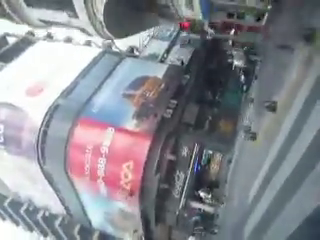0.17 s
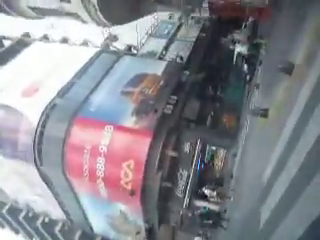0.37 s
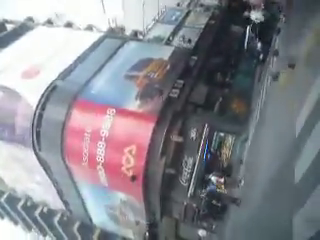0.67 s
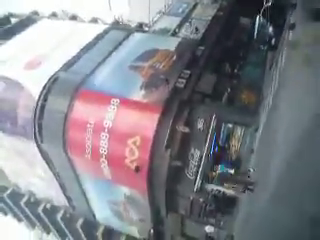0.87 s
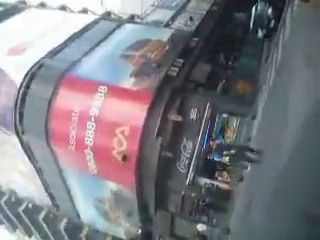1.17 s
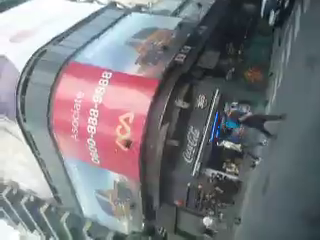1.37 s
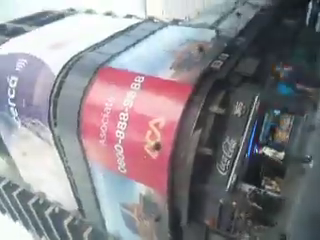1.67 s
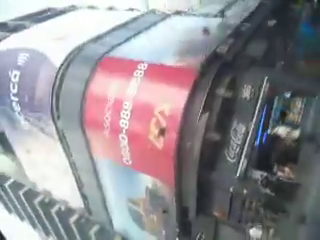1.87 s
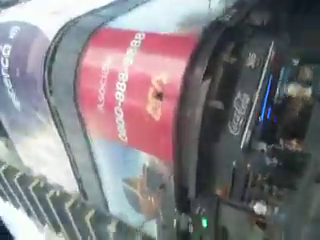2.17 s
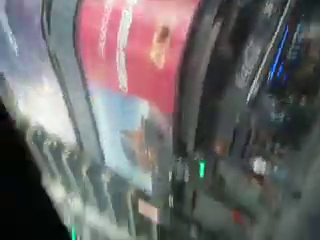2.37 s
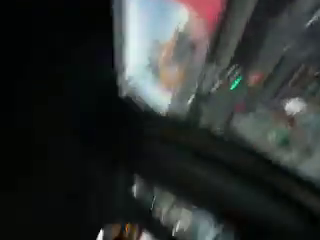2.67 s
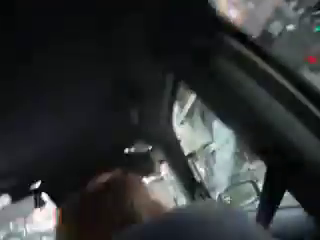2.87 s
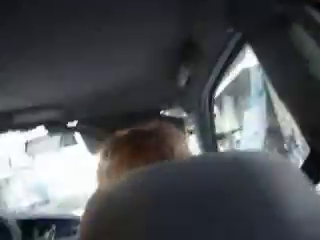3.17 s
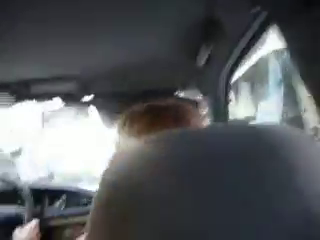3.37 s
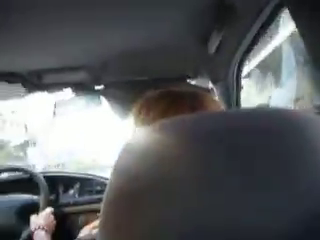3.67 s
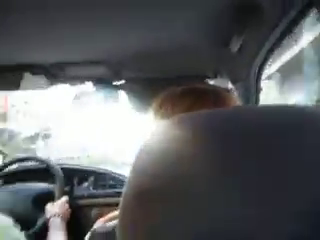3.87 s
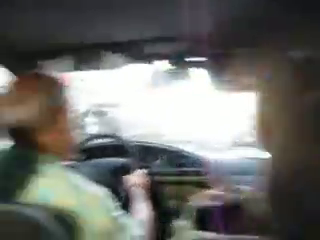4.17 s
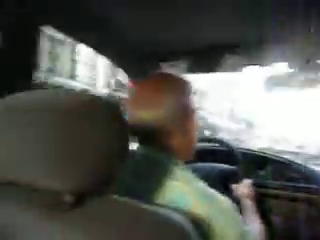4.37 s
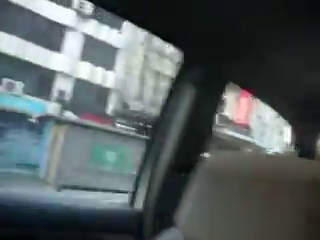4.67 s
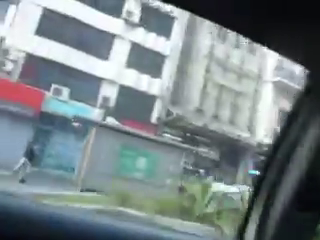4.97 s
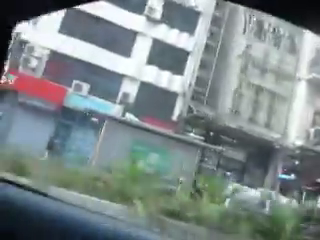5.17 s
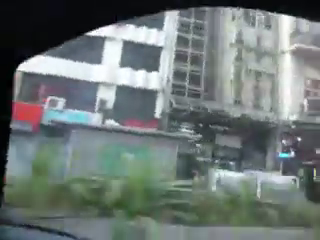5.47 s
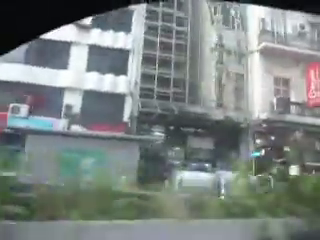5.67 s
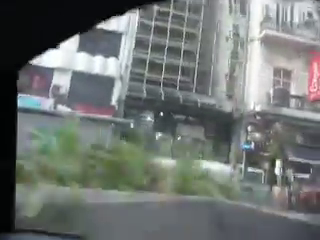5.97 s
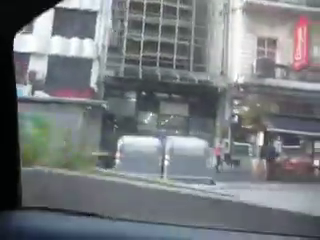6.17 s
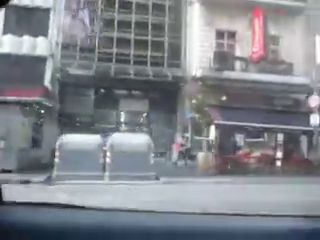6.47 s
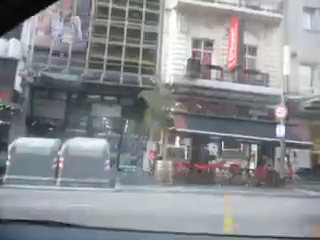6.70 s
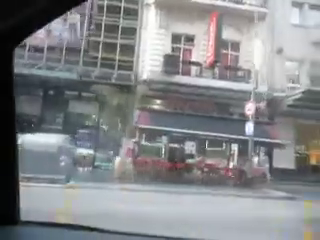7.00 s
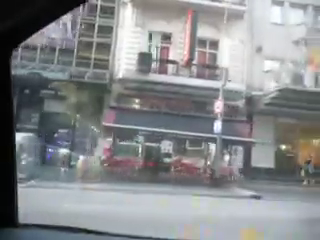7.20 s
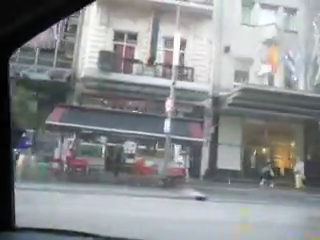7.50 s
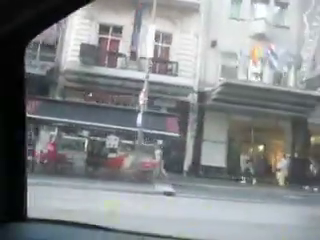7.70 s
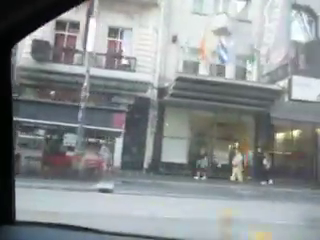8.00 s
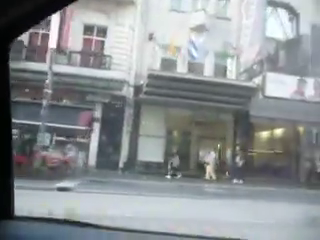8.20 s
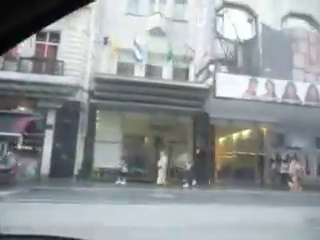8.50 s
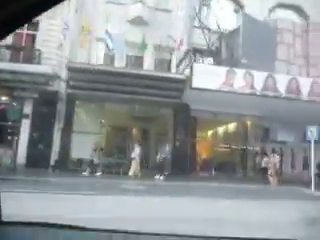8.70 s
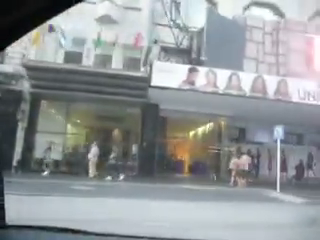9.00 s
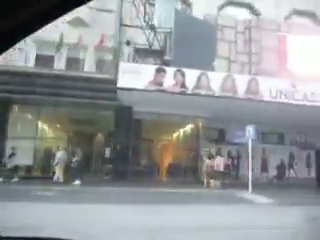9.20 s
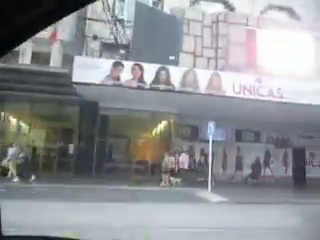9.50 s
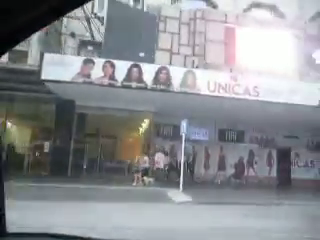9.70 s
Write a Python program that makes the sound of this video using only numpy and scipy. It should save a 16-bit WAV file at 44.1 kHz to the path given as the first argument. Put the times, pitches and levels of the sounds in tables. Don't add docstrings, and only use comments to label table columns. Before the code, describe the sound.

A small, coarse camera microphone rides in a car cabin. Heavy low rumble shakes and swells over rough asphalt, with a climbing engine hum underneath. Two short clicking gaps interrupt it. As the camera is turned, loud plastic snaps, scrapes and creaky ticks come very near, and the background dips and recovers. Afterwards the engine sits lower, tyre hiss grows, and jolts knock the interior trim.

```python
import sys
import numpy as np
from scipy import signal
from scipy.io import wavfile
from scipy.ndimage import uniform_filter1d

SR = 44100
rng = np.random.default_rng(int(sys.argv[2]) if len(sys.argv) > 2 else 0)


def generate_wav(signal):
    frames = np.transpose(np.atleast_2d(signal))
    scaled = np.clip(frames, -1, 1) * 32767
    pcm = np.round(scaled).astype(np.int16)
    wavfile.write(sys.argv[1], SR, pcm)


def voltage_ratio(decibels):
    exponent = np.asarray(decibels, float) / 20
    return 10 ** exponent


N = 434385


def rms_one(x):
    return x / np.sqrt(np.mean(x ** 2) + 1e-20)


def in_time(rows):
    s, *columns = np.transpose(rows)
    return [np.interp(np.arange(N) / SR, s, column) for column in columns]


def drift(rate_hz, depth_db):
    r = np.exp(-80 * np.pi * rate_hz / SR)
    slow = signal.lfilter([1], [1, -2 * r, r * r], rng.standard_normal(N // 40 + 2002))[2000:]
    return np.interp(np.arange(N) / 40, np.arange(len(slow)), voltage_ratio(depth_db * rms_one(slow)))


def ring(clicks, hz, t60):
    r = voltage_ratio(-60 / (t60 * SR))
    w = 2 * np.pi * hz / SR
    return signal.lfilter([0, np.sin(w)], [1, -2 * r * np.cos(w), r * r], clicks + 1e-18)


def band(x, low_hz, high_hz, order=2):
    return signal.sosfilt(signal.butter(order, [low_hz, high_hz], "band", fs=SR, output="sos"), x)


def low_pass(x, hz, order=2):
    return signal.sosfilt(signal.butter(order, hz, fs=SR, output="sos"), x)


def add(out, s, sound):
    i = round(s * SR)
    out[i:i + len(sound)] += sound[:N - i]


def banded_noise(spectrum, patchy_db):
    hz, level_db = np.transpose(spectrum[:-1])
    edges = np.geomspace(hz[0], hz[-1], int(3 * np.log2(hz[-1] / hz[0])) + 1)
    white = rng.standard_normal((2, N))
    out = 0
    for k, (low, high) in enumerate(zip(edges, edges[1:])):
        centre_db = np.interp(np.log(low * high) / 2, np.log(hz), level_db)
        out = out + voltage_ratio(centre_db) * drift(8, patchy_db) * band(white[k % 2], low, high)
    return rms_one(out)


# pitch in Hz, width in Hz,
# level in dB facing the first window, level in dB facing the second.
CABIN = [(22.16, 6, -15, -11), (81.45, 9, -7, -4), (113.4, 7, -15, -8), (135.3, 8.3, -6, -8),
         (192.3, 14, -8.5, -19.5), (254.25, 11, -14.5, -17), (402.3, 18, -26, -26.5)]


def hollow_cabin():
    turned = np.interp(np.arange(N) / SR, [2.9, 5.3], [0, 1])
    hollow = 0
    for hz, width_hz, first_db, second_db in CABIN:
        tone = rms_one(ring(rng.standard_normal(N), hz, 2.2 / width_hz))
        facing = voltage_ratio(first_db) * (1 - turned) + voltage_ratio(second_db) * turned
        hollow = hollow + facing * drift(1.2, depth_db=1.46) * tone
    return hollow


# time in seconds, coarseness of the asphalt in dB, street through the window in dB.
ROAD = [(0.0, 3, 1), (0.55, 1, 1), (1.1, -1.5, 0), (1.8, 0.5, -0.5), (2.3, 0.1, -0.5), (2.6, 2.5, 0),
        (3.2, -3, 1.5), (3.8, -4.5, 2), (4.4, -2.5, 2), (4.9, -0.85, 3), (5.6, -1.3, 1.5), (6.4, 1.8, 3.5),
        (7.2, 3.5, 2.5), (7.9, -0.75, 1.5), (8.3, -1.4, 4), (9.0, -0.3, 4.5), (9.5, 1.5, 6.5),
        (9.85, 2.5, 7)]
# time in seconds, length in seconds, swell in dB, lean from -1 (deep) to 1 (high).
HEAVES = [(0.272, .06, 3, 0.7), (0.586, .07, 4, 0.31), (1.4, 0.069, 2.5, -.4), (2.503, 0.046, 2, -0.3),
          (2.728, .08, 3.5, -0.11), (3.363, 0.031, 3.5, 0.76), (3.896, .08, 3.5, 0.79),
          (4.069, 0.037, 6, -0.87), (4.296, .05, 3, -0.71), (4.691, 0.043, 1, .5), (5.334, .04, -6, .4),
          (5.422, 0.1, 8.5, 0.38), (5.747, .06, 4, 1), (6.041, 0.055, -4, .6), (6.533, .08, -0.5, 1),
          (6.842, 0.11, -5, 0.38), (7.099, 0.038, -0.5, 0.63), (7.598, 0.09, -0.5, 0.99),
          (8.151, .06, 2.5, .6), (8.67, .08, 2, 0.81), (9.21, .08, 2.5, -0.48), (9.549, .08, 0, 0.75),
          (9.804, .05, -0.5, -.2)]
# pitch in Hz, level in dB per Hz.
BOOM = [(9.4, -39), (16, -8), (54, -4), (81, 2.5), (129, -1), (180, -8), (230, -40), (400, -120)]
ROAR = [(88, -31), (150, 1), (210, -7.5), (259, -8.5), (360, -20), (470, -50.5), (790, -120)]
TREAD = [(180, -28.5), (300, 0), (350, -8), (397, -3), (614, -11), (911, -14), (1080, -26.5), (1250, -24),
         (1620, -59), (2750, -120)]
RUSH = [(590, -29), (1000, -6.5), (1090, -6.5), (1310, -6.5), (1450, -8.5), (2540, -17.5), (4470, -24),
        (6440, -24), (8000, -28), (10400, -63), (17600, -120)]
# level in dB, share of coarseness, share of street, share of a heave.
BOOM_MIX, ROAR_MIX = (-27, 0.84, 0.03, 0.67), (-33.5, 0.53, 0.12, 1.05)
TREAD_MIX, RUSH_MIX = (-46, -0.38, 1.1, -0.01), (-60.5, -0.16, 0.71, -0.04)


def road():
    t = np.arange(N) / SR
    coarse_db, street_db = in_time(ROAD)
    deep_db = high_db = 0
    for s, length, db, lean in HEAVES:
        swell_db = db * np.exp(-((t - s) / length) ** 2)
        deep_db = deep_db + swell_db * (1 - lean)
        high_db = high_db + swell_db * (1 + lean)

    def gain(mix, heave_db):
        db, coarse, street, heave = mix
        return voltage_ratio(db + coarse * coarse_db + street * street_db + heave * heave_db)

    uneven = drift(11, depth_db=1.25)
    boom = voltage_ratio(-1.5) * uneven ** 1.1 * banded_noise(BOOM, patchy_db=-1.77) + hollow_cabin()
    roar = uneven ** 1.4 * banded_noise(ROAR, patchy_db=0.27)
    tread = uneven ** 1.1 * low_pass(banded_noise(TREAD, patchy_db=1.53), 1060, order=6)
    rush = uneven ** 0.45 * banded_noise(RUSH, patchy_db=1.25)
    low = gain(BOOM_MIX, deep_db) * boom + gain(ROAR_MIX, high_db) * roar
    return low + gain(TREAD_MIX, high_db) * tread + gain(RUSH_MIX, high_db) * rush


# time in seconds, firing rate in Hz, load in dB.
ENGINE = [(0.0, 39, -34), (0.44, 43.05, -34), (1.04, 49.83, -28), (1.78, 55.9, -24.5), (2.0, 54.98, -24),
          (2.82, 47.4, -29.5), (3.43, 45.76, -35.5), (4.72, 45.52, -34), (5.4, 36.5, -30.5),
          (5.73, 33.9, -39.5), (6.2, 34.5, -34), (6.78, 33.9, -40.5), (7.57, 36.47, -37.5),
          (8.5, 37.85, -27), (9.15, 38.82, -30.5), (9.3, 37.8, -35), (9.85, 35.6, -39.5)]
# multiple of the firing rate, level in dB.
ENGINE_ORDERS = [(1, -2.5), (2, -9.5), (3, -14.5), (4, -17)]


def engine():
    hz, load_db = in_time(ENGINE)
    phase = 2 * np.pi * np.cumsum(hz) / SR
    tones = sum(voltage_ratio(db) * drift(3, depth_db=2.5) * np.sin(k * phase) for k, db in ENGINE_ORDERS)
    return voltage_ratio(load_db + 4.5) * tones


# time in seconds, peak in dB, upper trim tones in dB, shudder length in seconds.
BUMPS = [(1.683, -17, -27.5, 0.025), (2.146, -37, -6, 0.056), (2.821, -28.5, -11, 0.025),
         (4.357, -28, -6.5, 0.03), (4.761, -22, -4, 0.02), (5.278, -36, -8.5, 0.021),
         (5.404, -21.5, -17, 0.052), (5.706, -21, -9, 0.018), (6.162, -33, -12.5, 0.014),
         (6.444, -43.5, -6.5, 0.029), (6.504, -27.5, -0.5, 0.04), (6.629, -30.5, -22.5, 0.02),
         (7.042, -31.5, -14.5, 0.028), (7.395, -37.5, -15, 0.021), (7.431, -17, -11.5, 0.035),
         (7.665, -19, -16.5, 0.025), (7.972, -37, -11, 0.022), (8.139, -13.5, -12, 0.022),
         (8.399, -29.5, -14, 0.021), (8.445, -25.5, -4, 0.024), (8.912, -21.5, -6.5, 0.024),
         (8.959, -32.5, -11, 0.011), (9.216, -37.5, -2, 0.018), (9.441, -34, -15.5, 0.041),
         (9.705, -21.5, -12.5, 0.031)]
# pitch in Hz, level in dB, time to fall 60 dB in seconds.
TRIM_LOW = [(260, -4, .07), (392, 0, .08), (470, -10, .05)]
TRIM_HIGH = [(690, 0, .045), (790, -6, .04), (960, -12, .04)]


def ring_trim(shudder, modes):
    sound = sum(voltage_ratio(db) * ring(shudder, hz, t60) for hz, db, t60 in modes)
    return sound / np.abs(sound).max()


def bumps():
    out = np.zeros(N)
    t = np.arange(SR // 6) / SR
    for s, db, upper_db, length in BUMPS:
        shudder = rng.standard_normal(len(t)) * (t < length) * np.exp(-t / 0.025)
        shudder[0] += 35
        shudder = low_pass(shudder, 900, order=4)
        knock = ring_trim(shudder, TRIM_LOW) + voltage_ratio(upper_db + 1.5) * ring_trim(shudder, TRIM_HIGH)
        add(out, s + .003, voltage_ratio(db - 3.4) * knock)
    return out


# time in seconds, peak in dB, brightness in dB, lasting ring in dB.
SNAPS = [
    (3.4261, -14.5, 4.5, -3),
    (3.965, -11, -28, -19),
]
# pitch in Hz, level in dB, time to fall 60 dB in seconds.
SNAP_MODES = [(855, 5, 0.0031), (2360, 1, 0.0023), (3750, -10, 0.0046), (5500, -19, 0.0034)]


def snaps():
    out = np.zeros(N)
    click = low_pass(signal.unit_impulse(SR // 10), 3400)
    for s, db, bright_db, ring_db in SNAPS:
        crack = 0
        for hz, level_db, t60 in SNAP_MODES:
            crack = crack + voltage_ratio(level_db + bright_db * (hz > 1500)) * ring(click, hz, t60)
        add(out, s, voltage_ratio(db) * (crack + voltage_ratio(ring_db) * ring(click, 985, 0.03)))
    return out


def stroke(s, length, db, swell_db):
    touch_s, lift_s = 0.017, 0.0064
    times = s + np.cumsum([-touch_s, touch_s, max(length, .001), lift_s])
    shape_db = np.interp(np.arange(N) / SR, times, [-25, 0, swell_db, swell_db - 25], left=-99, right=-99)
    return voltage_ratio(db + shape_db)


# start in seconds, length in seconds, level in dB, swell in dB.
PRESSES = [(3.056, 0.035, -52.5, 0.5), (3.15, .04, -53, 7), (3.197, .04, -45.5, -2), (3.248, .1, -48.5, 1),
           (3.34, .07, -46, -5), (3.436, 0.027, -38, -10.5), (3.485, .07, -39.5, -10),
           (3.6, 0.078, -50.5, -1), (3.687, .06, -45.5, 6), (3.81, .025, -50, 6), (3.851, 0.037, -34, -5.5),
           (3.901, .04, -33.5, -5.5), (3.969, 0.045, -46, -6), (5.009, 0.033, -44, -3)]
# start in seconds, length in seconds, level in dB,
# brightness in dB per band, swell in dB.
SLIDES = [(3.052, 0.026, -70, -1.5, -3.5), (3.201, 0.046, -70.5, 3, -6), (3.201, .138, -55, -10, 6.5),
          (3.337, 0.067, -63, -13, -11.5), (3.435, 0.019, -45, -8.5, -8), (3.462, 0.035, -50.5, -7, 3),
          (3.51, 0.069, -47.5, -6.5, -11), (3.606, .04, -56.5, -12, -3), (3.659, 0.035, -59, -13, 7),
          (3.699, 0.039, -50.5, -3.5, 0.5), (3.758, 0.023, -57, 2.5, -0.5), (3.792, .045, -60, -1, 5.5),
          (3.842, .035, -39.5, -8.5, -6.5), (3.898, .03, -47, -17, -1.5), (3.965, 0.085, -55, -10.5, -5),
          (4.001, .05, -76, 5, -1.5), (5.012, 0.027, -48, -21.5, -1), (5.049, .035, -57.5, -14.5, -5)]
# from Hz, to Hz.
RUB_BANDS_HZ = [(350, 1350), (1750, 2650), (2650, 3950), (4600, 7200)]
# share of brightness, level in dB.
SLIDE_COLOUR = [(0, 0.5), (.6, -2), (2.1, -0.5)]


def rub():
    sizes = voltage_ratio(5.5 * np.minimum(rng.exponential(1, N), 4)) * rng.choice([-1, 1], N)
    slips = rms_one(sizes * (rng.random(N) < 1500 * drift(40, depth_db=4) / SR))
    smooth = rng.standard_normal(N)

    def friction(grip, hz):
        return rms_one(band(np.sqrt(grip) * slips + np.sqrt(1 - grip) * smooth, *hz, order=3))

    out = sum(stroke(*row) for row in PRESSES) * friction(0.46, RUB_BANDS_HZ[0])
    for hz, (share, colour_db) in zip(RUB_BANDS_HZ[1:], SLIDE_COLOUR):
        touch = 0
        for s, length, db, bright_db, swell_db in SLIDES:
            touch = touch + stroke(s, length, db + colour_db + share * bright_db, swell_db)
        out = out + touch * friction(0.22, hz)
    return out


# time in seconds, peak in dB, pitch in Hz, low body in dB.
TICKS = [(0.129, -49, 1950, -32.5), (0.3558, -45, 1510, -31), (0.4449, -45, 1380, -43.5),
         (1.1273, -43.5, 1320, -43), (3.0774, -57, 1310, -31), (3.3454, -47, 1580, -32),
         (3.4925, -45, 1390, -33), (3.5754, -44, 1350, -38), (3.5925, -32, 1380, -25),
         (3.6117, -38.5, 1580, -46), (3.6343, -40.5, 1510, -40), (3.707, -40, 1920, -45),
         (3.7104, -33.5, 1390, -30.5), (3.7207, -21.5, 1370, -23.5), (3.7346, -33.5, 1320, -32.5),
         (3.7466, -31.5, 1320, -37.5), (3.8437, -33, 2010, -16), (3.8562, -28.5, 1490, -21),
         (3.8654, -32, 1310, -21), (3.895, -57, 1630, -32), (3.9014, -42, 1520, -18.5),
         (3.9601, -38, 1300, -22), (4.1683, -42.5, 1350, -40), (4.648, -41.5, 1440, -40.5),
         (4.836, -47.5, 1710, -41.5), (4.8534, -38, 1390, -41.5), (5.017, -35.5, 1810, -26),
         (5.034, -41, 1970, -26), (5.0275, -49.5, 1900, -45), (6.4216, -31.5, 1320, -26)]


def ticks():
    out = np.zeros(N)
    click = signal.unit_impulse(SR // 50)
    body = low_pass(ring(click, 720, 0.0042), 1400)
    for s, db, hz, body_db in TICKS:
        sharp = low_pass(band(click, .6 * hz, 2.4 * hz, order=1), 5000)
        add(out, s + .001, voltage_ratio(db + 4) * sharp / sharp.max() + voltage_ratio(body_db + 8) * body)
    return out


# time in seconds, drop in dB.
DUCKS = [
    (0.66, 3.5),
    (1.955, 3),
    (2.987, 4.5),
    (3.43, 5),
    (3.97, 8),
    (5.46, 1.5),
    (8.2, -2),
]


def gain_control():
    t = np.arange(N) / SR
    drop_db = np.max([(t > s) * (db - 8 * (t - s)) for s, db in DUCKS], axis=0)
    return voltage_ratio(-uniform_filter1d(drop_db.clip(0), size=400))


def scene():
    cabin = gain_control() * (road() + engine())
    return (cabin + bumps() + snaps() + rub() + ticks())[None]


# time in seconds, height of the wave where it is cut (full scale 1).
CUT_HEIGHTS = [
    (0, -.092),
    (1.81481, .135),
    (1.95542, .03),
    (2.84823, -.05),
    (2.98918, -.018),
    (9.8498, .045),
]


def cut_clicks(x):
    t, x = np.arange(N) / SR, x.copy()
    for s, height in CUT_HEIGHTS:
        near = np.abs(t - s) < .01
        x[near] += (height - x[round(s * SR)]) * np.exp(-((t[near] - s) / .003) ** 2)
    return x


# from seconds, to seconds.
MUTES = [
    (1.81481, 1.95542),
    (2.84823, 2.98918),
]


def unmuted():
    t = np.arange(N) / SR
    return ~np.any([(t >= a) & (t < b) for a, b in MUTES], axis=0)


def digitise(x):
    offset, step = .0182, .00095
    x = signal.resample_poly(x, 160, 441, padtype="edge")
    buzz = (np.arange(len(x)) % 36 == 0) * 1.
    analog = x + offset - step * (0.41 * buzz + 0.13 * rng.standard_normal(len(x)))
    levels = step * (np.round(analog / step + 0.13) - .2)
    return signal.resample_poly(levels, 441, 160, padtype="edge", window=("kaiser", 10))[:N]


# multiple of the buzz pitch, level in dB.
WHINE = [(7, -92), (8, -89), (14, -86), (15, -81)]


def whine():
    phase = 2 * np.pi * 16000 / 36 * np.arange(N) / SR
    return sum(voltage_ratio(db) * np.sin(k * phase) for k, db in WHINE)


def top_cut(x):
    return signal.sosfilt(signal.butter(12, 8570, fs=SR, output="sos"), x)


def record(dry):
    live = unmuted()
    x = digitise(cut_clicks(dry[0]) * live) + live * whine()
    x = signal.lfilter(*signal.iirnotch(4390, 45, fs=SR), x)
    x = low_pass(x, 7900)
    return top_cut(x[None])


dry = scene()
out = record(dry)
generate_wav(out)
```